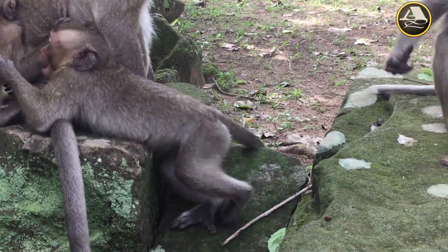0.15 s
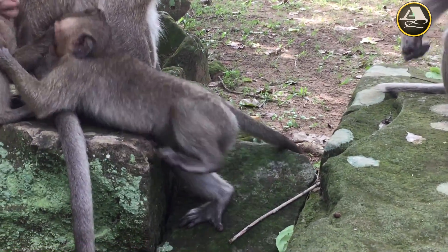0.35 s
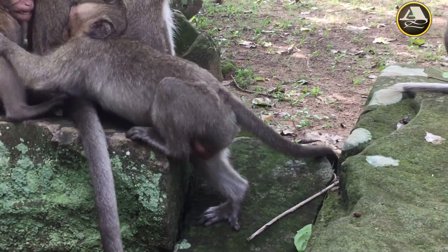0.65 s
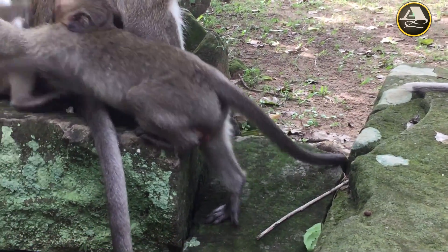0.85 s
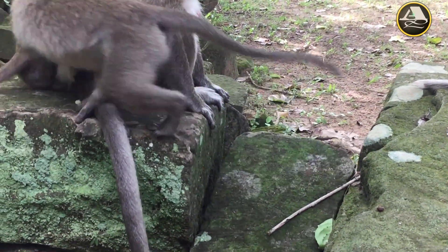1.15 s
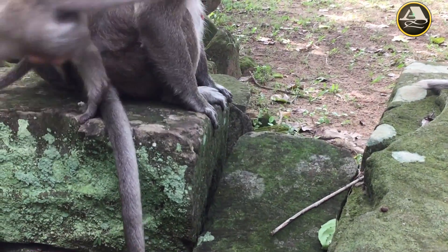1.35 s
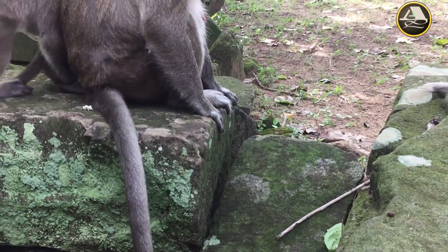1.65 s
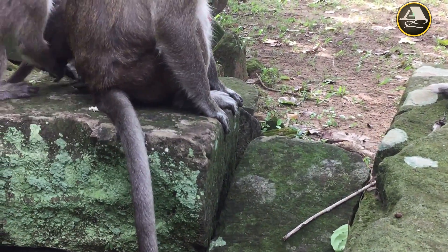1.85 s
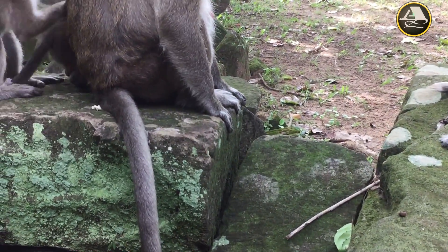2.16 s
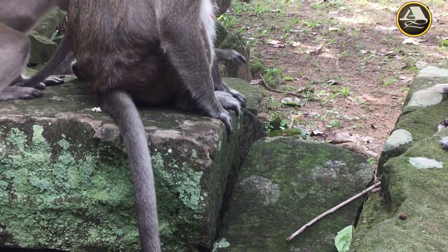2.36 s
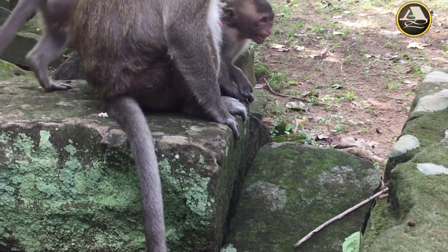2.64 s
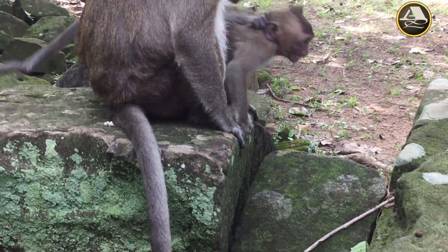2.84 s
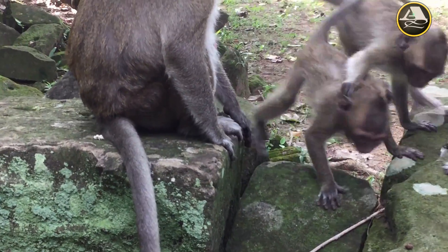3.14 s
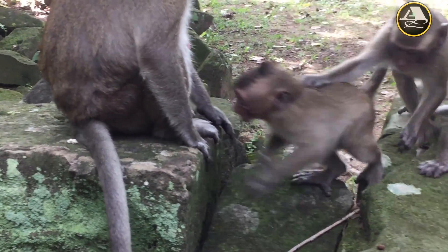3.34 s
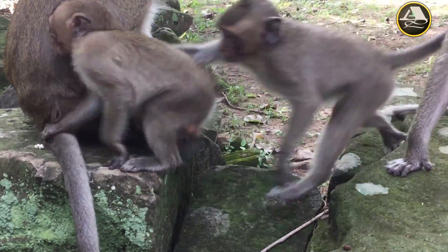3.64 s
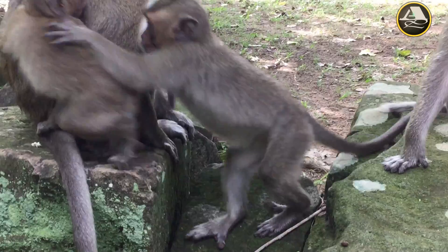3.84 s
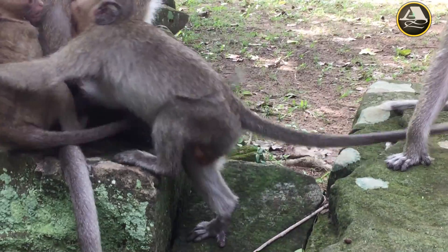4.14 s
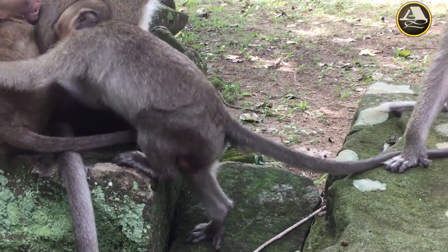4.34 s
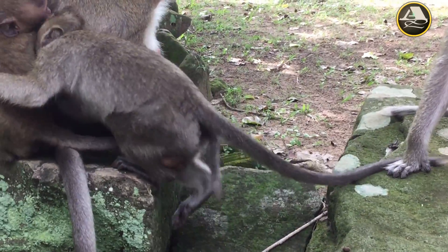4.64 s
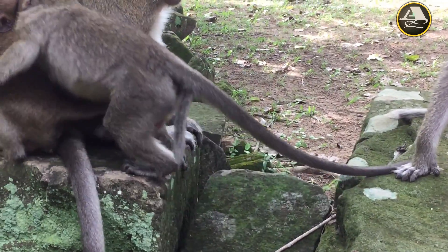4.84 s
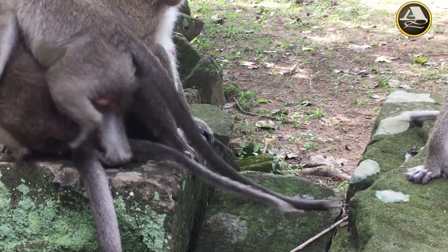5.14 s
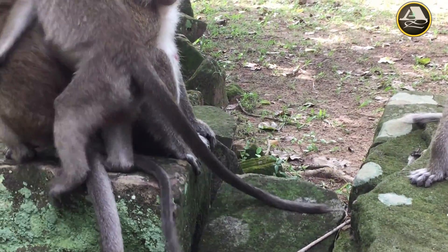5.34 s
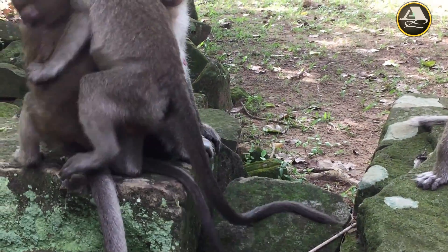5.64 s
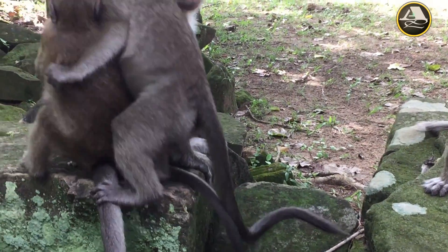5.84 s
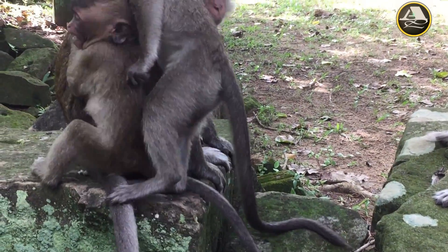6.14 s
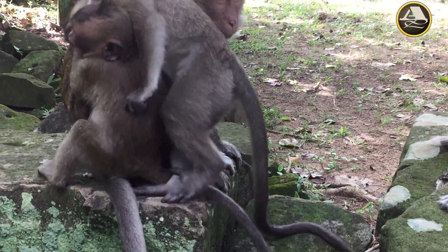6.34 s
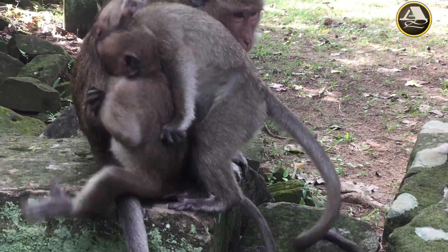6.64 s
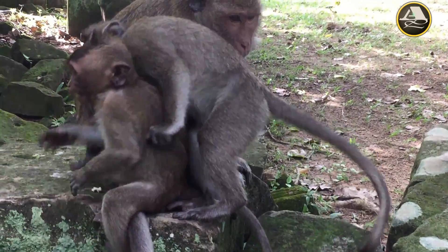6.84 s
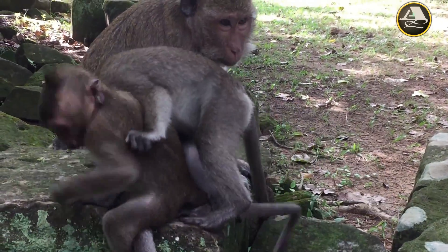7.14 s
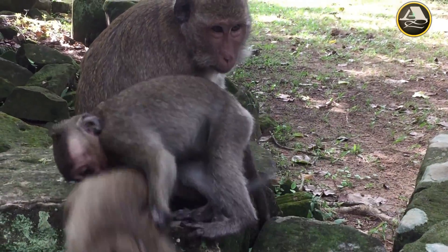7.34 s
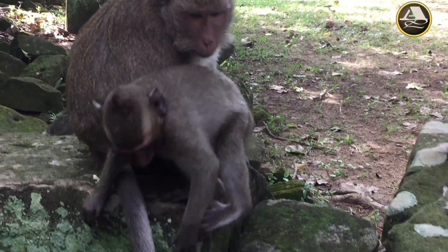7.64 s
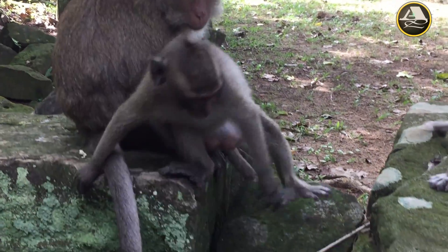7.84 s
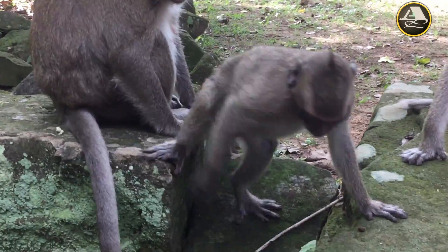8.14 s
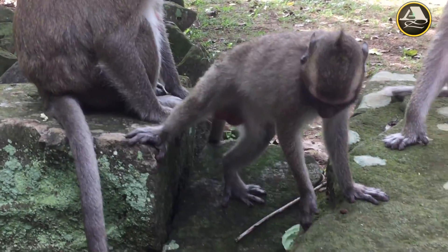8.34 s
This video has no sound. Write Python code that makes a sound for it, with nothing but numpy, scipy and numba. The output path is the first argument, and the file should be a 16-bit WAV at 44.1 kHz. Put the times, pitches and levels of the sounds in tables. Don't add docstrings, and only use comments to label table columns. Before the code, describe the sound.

Outdoors among trees, young monkeys quarrel a few metres from a single-channel microphone. A fading rasp gives way to a quick pulsed chatter, then isolated squeaks and raspy chirps with gaps between. Faint paw scuffs and claw ticks touch stone. Short screams break into rasp, and the last second brings the loudest, most crowded cries. A deep, steady far traffic rumble continues throughout, and each cry leaves a short diffuse echo.

```python
import sys
import numpy as np
from scipy import signal
from scipy.fft import rfft, irfft, next_fast_len
from scipy.io import wavfile
from scipy.ndimage import uniform_filter1d
from numba import njit

SR = 44100
rng = np.random.default_rng(int(sys.argv[2]) if len(sys.argv) > 2 else 0)


def invert_db(x):
    u = np.asarray(x, float) / 20
    return 10 ** u


def wrap_up_sound(samples):
    columns = np.atleast_2d(samples).T
    tamed = np.clip(columns, -1, 1)
    steps = np.round(tamed * 32767).astype(np.int16)
    wavfile.write(sys.argv[1], SR, steps)


N = 374409
T = np.arange(N) / SR

# t/s, length/s, f/Hz, level/dB, octave re pitch/dB
STEADY_WHISTLES = [(.5, .28, 4680, -70.5, -20), (0.908, .039, 4190, -33.5, -7),
                   (2.147, .007, 4500, -39, -23), (2.157, .008, 3490, -36.5, -14),
                   (2.187, .022, 3592, -30.5, -11), (3.068, .013, 5312, -29, -9),
                   (3.084, .027, 3784, -28.5, -5), (4.431, .011, 5040, -32, -28), (7.61, .02, 6375, -36, 4),
                   (7.627, .033, 5900, -38, 2), (7.797, .06, 3337, -28.5, -24),
                   (8.284, .036, 3254, -30.5, -27), (8.446, 0.019, 3286, -22.5, -23)]
# t/s, length/s, first f/Hz, last f/Hz, level/dB
FALLING_WHISTLES = [
    (1.115, .016, 4800, 4550, -47),
    (4.493, .04, 4766, 3950, -36),
    (5.033, .008, 4352, 4200, -56),
    (5.454, .037, 4018, 2750, -28.5),
    (5.512, 0.0097, 4897, 4640, -38),
]
# (t/s, f/Hz, level/dB)
LONG_WHISTLES = [
    (-5.5, [(0, 2980, -47.5), (.04, 2980, -55.5), (.16, 2980, -70)]),
    (-18.5, [(2.728, 5250, -49.5), (2.738, 5350, -29), (2.75, 5780, -30.5), (2.772, 5520, -25), (2.785, 4130, -36)]),
    (-7, [(3.13, 5040, -26), (3.141, 5450, -30), (3.152, 5283, -27), (3.158, 5345, -28), (3.167, 4200, -33)]),
    (-3.5, [(5.06, 4503, -49), (5.08, 4500, -43.5), (5.09, 4200, -38.5), (5.098, 3621, -47)]),
    (-8, [(5.54, 3985, -40), (5.56, 5366, -36.5), (5.574, 5200, -39.5), (5.584, 4710, -35.5), (5.612, 3710, -36)]),
    (-17, [(7.5, 3017, -32), (7.52, 2638, -21.5), (7.54, 2620, -26.5), (7.558, 2912, -27), (7.585, 3106, -46)]),
]
# (t/s, f/Hz, level/dB)
LAST_CRY = [
    (-1.5, [(8.149, 3800, -42), (8.156, 5016, -32), (8.165, 5808, -29), (8.19, 5696, -28.5), (8.212, 6600, -30), (8.234, 6573, -22), (8.239, 6570, -35)]),
    (-9.5, [(8.242, 4392, -39), (8.248, 4030, -23.5), (8.262, 3150, -18.5), (8.28, 2560, -31.5)]),
    (-11, [(8.32, 2315, -40), (8.346, 2220, -45), (8.37, 3300, -29.5), (8.386, 3800, -35), (8.398, 4800, -31.5), (8.41, 4050, -30), (8.425, 3620, -39)]),
]
# t/s, length/s, f/Hz, level/dB, partial 3 re level/dB
CHIRPS = [
    (1.911, .017, 1720, -43, -7),
    (3.625, 0.015, 1800, -48, 2.5),
    (4.432, 0.021, 1700, -46, 8.5),
    (4.455, 0.019, 1308, -44.5, 2.5),
    (7.048, 0.02, 1590, -31, -10),
    (7.626, .013, 1940, -43, 2.5),
    (8.473, .015, 840, -51, 17),
]
# t/s, slow pitch f/Hz, level/dB
SCREAMS = [
    [(5.358, 1290, -42), (5.368, 1327, -34), (5.385, 1500, -49), (5.404, 1474, -45), (5.42, 1420, -45),
     (5.437, 1315, -43)],
    [(7.381, 1398, -35), (7.399, 1433, -28.5), (7.423, 1442, -35), (7.439, 1283, -37), (7.454, 1434, -25),
     (7.482, 1300, -32), (7.51, 1160, -30)],
]
SCREAM_PARTIALS_DB = [
    (-18, 0, -13, -1.4),
    (-23.5, 0.02, -3, 0.018),
]
# partial number, level column it follows, level re column/dB
SQUEAK_STACK = [(1, 0, 0), (2, 1, 0), (3, 1, -13), (4, 1, -18)]
CHIRP_STACK = [(1, 0, 0), (2, 1, -3), (3, 1, 0), (4, 1, -5), (5, 2, 1), (6, 2, 0), (7, 2, -1), (8, 2, -3),
               (9, 2, -4)]
SCREAM_STACK = [(2, 0, 0), (3, 1, 0), (4, 2, -8), (5, 2, 0), (6, 3, 0), (7, 2, -8), (8, 2, -10),
                (9, 3, -17)]

# t/s, length/s, throat f/Hz, level/dB, mouth re throat/dB
SWELLS = [(.913, .043, 2800, -27.5, 11), (.956, 0.047, 2760, -26.5, 5), (3.071, 0.043, 3290, -29, 17.5),
          (3.15, .016, 4600, -30, 9), (4.435, 0.042, 2760, -32, 14.5), (4.492, .042, 2790, -40.5, 3),
          (5.421, 0.076, 3250, -37.5, 11.5), (5.5, 0.16, 3150, -51.5, -3), (7.38, .07, 2880, -29.5, 10.5),
          (7.451, .093, 2752, -23.5, 2.5), (7.72, 0.1, 3260, -23.5, -13.5), (8.232, .048, 3220, -21, 0),
          (8.405, .06, 3390, -20.5, -13.5)]
BURSTS = [(1.949, 0.009, 1767, -38.5, -26), (1.98, .014, 1466, -47, -13), (2.184, .02, 3604, -22, -19),
          (2.204, .014, 2610, -30, 1), (2.218, 0.017, 1600, -39, -8.5), (3.129, .02, 3087, -47.5, 17),
          (3.1665, .018, 2548, -32.5, -9.5), (5.084, 0.022, 2780, -43, 10.5),
          (5.356, .064, 3070, -37.5, -9), (7.872, .028, 2926, -35, -17), (7.94, .07, 2800, -49.5, 4.5),
          (8.145, .008, 2400, -34.5, -1.5), (8.281, .05, 3170, -20, -11)]
HISSES = [
    (7.545, .042, 2800, -28.5, 4),
    (7.628, .092, 2800, -49.5, 10.5),
    (7.813, .058, 3306, -54.5, 0),
    (7.901, .028, 3217, -51, -5),
    (8.21, .022, 3600, -23, 2.5),
    (8.332, .072, 3202, -46, -1),
]
DYING = [
    (0, .16, 2550, -44.5, -5.5),
]
# t/s, length/s, level/dB
CHATTER = [
    (1.057, 0.033, -32.5),
    (1.107, 0.065, -38),
    (1.174, 0.055, -39),
    (1.234, 0.057, -39.5),
    (1.296, 0.052, -42),
    (1.344, 0.027, -43.5),
    (1.371, 0.092, -51),
]
# t/s, slap rate f/Hz, unevenness (0-1), chest tone level/dB
SLAPS = [
    (0, 1300, .2, -46.5),
    (7.72, 1300, 0.3, -38),
    (7.75, 395, 0.08, -27),
    (7.812, 480, 0.03, -15.5),
    (7.868, 1300, 0.4, -36),
    (8.27, 1300, .25, -40),
    (8.29, 370, .07, -25.5),
    (8.401, 900, .15, -50),
    (8.42, 400, .05, -25),
    (8.49, 390, 0.05, -20),
]
# f/Hz, width/Hz, level/dB
MOUTH = [(6970, 1100, 1), (8440, 2500, 0.99)]
TEETH = [(12380, 1400, -7.5), (14200, 2500, -13)]
HOLD_SHAPE = 0.8, -0.03, -9, -6.5
FALL_SHAPE = (1.04, 0.35, -4.5, -1.5)
CHIRP_SHAPE = (0.6, -0.46, 0, -8.5)
SWELL_SHAPE = (0.3, 0.82, -12.5, -6.5)
BURST_SHAPE = (.15, .5, -4.5, -12)
HISS_SHAPE = (-0.7, 0.9, -4.5, -3.5)
CHATTER_SHAPE = (0.07, 0.27, -8.5, -12.5)
DYING_SHAPE = (0.3, 0.3, 1, -24)

# t/s, level/dB, length/s
PADS = [
    (3.781, -50.5, 0.0049),
    (5.963, -48, 0.032),
    (7.881, -46, 0.0137),
    (7.999, -55.5, 0.058),
]
CLAWS = [
    (1.109, -30.5, .003),
    (3.372, -55, 0.018),
    (3.408, -55, 0.0052),
    (3.818, -46, 0.0045),
    (7.066, -46.5, 0.0046),
    (7.248, -57, .03),
    (7.679, -39.5, 0.045),
]
FUR = [
    (.684, -70.5, .02),
    (1.99, -54, .012),
    (3.504, -52.5, 0.024),
    (3.553, -59, .02),
    (3.634, -54, .035),
    (3.716, -60, 0.0118),
    (3.831, -57, 0.016),
]
# thud level/dB, scrape level/dB, hiss level/dB
TOUCH_DB = [
    (2, -19.5, -21.5),
    (-10, 0.5, -7.5),
    (-15, -10, -3.5),
]
# t/s, f/Hz, level/dB
WHINE = [
    (0.8, 1014, -58.5),
    (1.47, 1037, -58.5),
    (2.9, 705.6, -66.5),
]
# f/Hz, density level/dB
WOOD_SPECTRUM = [(13, -57.5), (22, -30.5), (63, -4), (92, 0), (115, -1), (147, -11), (270, -29.5),
                 (328, -34), (432, -37.5), (730, -39.5), (1580, -40), (4760, -48.5), (5170, -50.5),
                 (16000, -64)]

FALL_BEND, FALL_OCTAVE_DB = 1.8, -6.5
CHIRP_SAG, CHIRP_TOP_DB = 0.05, -28
CHATTER_HZ, CHATTER_SAG_HZ_PER_S = 2480, 350
CHATTER_MOUTH_DB, CHATTER_CLOSING_DB_PER_S = -5, -23
SWELL_TEETH_DB, BURST_TEETH_DB, BARED_TEETH_DB, CHATTER_TEETH_DB = -9.5, -14, 4.5, -7.5
THROAT_WIDTH_HZ, THROAT_SKIRT_DB, HUSH_DB = 620, -10, -8
ECHO_T60_S, ECHO_TREBLE_T60_S, ECHO_DB = 0.44, 0.31, -15
WOOD_DB = -39.5


def unit(x):
    return x / np.sqrt(np.mean(x ** 2))


@njit
def resonate(x, g, k):
    y, band, low = np.empty(len(x)), 0., 0.
    for i in range(len(x)):
        v = (band + g[i] * (x[i] - low)) / (1 + g[i] * (g[i] + k[i]))
        band = 2 * v - band
        low = low + 2 * g[i] * v
        y[i] = k[i] * v
    return y


def ring(x, modes, shift=1):
    out = 0
    for hz, width, db in modes:
        hz = hz * shift * np.ones(len(x))
        g, k = np.tan(np.pi * hz / SR), width / hz
        out = out + invert_db(db) * resonate(resonate(x, g, k), g, k)
    return unit(out)


def walk(rate):
    k = max(int(SR / rate), 1)
    steps = np.repeat(rng.standard_normal(N // k + 1), k)
    return unit(uniform_filter1d(steps, k)[:N])


def contours(tables, edge_s):
    rows = np.concatenate(tables)
    s, *columns = rows[np.argsort(rows[:, 0], kind="stable")].T
    gate, k = np.zeros(N), max(int(edge_s * SR), 1)
    for note in tables:
        gate[int(note[0][0] * SR):int(note[-1][0] * SR) + 1] = 1
    gate = uniform_filter1d(gate, k, origin=(k - 1) // 2)
    return gate, [uniform_filter1d(np.interp(T, s, c), k) for c in columns]


def breath(s, length, shape, hz, dbs, drop_hz=0):
    rise, hold, first_db, last_db = shape
    share = np.array([0, np.clip(rise, .02, .6), np.clip(hold, .05 + rise, .97), 1])
    levels = np.add.outer([first_db, 0, 0, last_db], dbs)
    return np.column_stack([s + length * share, hz - drop_hz * share ** FALL_BEND, levels])


def voice(tables, stack, jitter, shimmer_db):
    gate, (hz, *dbs) = contours(tables, edge_s=.003)
    on, out, flicker = gate > 1e-6, np.zeros(N), shimmer_db * walk(250)
    trembling_hz = hz * (1 + jitter * walk(500))
    phase = 2 * np.pi * np.cumsum(trembling_hz[on]) / SR
    for k, column, db in stack:
        partial_db = np.maximum(dbs[column][on], dbs[0][on] - 22.0)
        level = invert_db(db + partial_db + np.roll(flicker, k * SR // 7)[on])
        out[on] += (k * hz[on] < SR * 9 / 20) * level * np.sin(k * phase)
    return np.sqrt(2) * gate * out, gate


def squeaks():
    notes = [breath(s, n, HOLD_SHAPE, hz, [db, db + up]) for s, n, hz, db, up in STEADY_WHISTLES]
    for s, n, first_hz, last_hz, db in FALLING_WHISTLES:
        notes.append(breath(s, n, FALL_SHAPE, first_hz, [db, db + FALL_OCTAVE_DB], first_hz - last_hz))
    for up, cry in LONG_WHISTLES + LAST_CRY:
        notes.append(np.array([(s, hz, db, db + up) for s, hz, db in cry]))
    return voice(notes, SQUEAK_STACK, jitter=.01, shimmer_db=2.5)


def chirps():
    notes = []
    for s, n, hz, db, up in CHIRPS:
        dbs = [db, db + up, db + up + CHIRP_TOP_DB]
        notes.append(breath(s, n, CHIRP_SHAPE, hz, dbs, CHIRP_SAG * hz))
    return voice(notes, CHIRP_STACK, jitter=.012, shimmer_db=3)


def screams():
    notes = [np.array([(s, hz, *np.add(db, partials)) for s, hz, db in rows])
             for rows, partials in zip(SCREAMS, SCREAM_PARTIALS_DB)]
    return voice(notes, SCREAM_STACK, jitter=.013, shimmer_db=4)


def rasp_notes():
    kinds = [(SWELLS, SWELL_SHAPE, SWELL_TEETH_DB), (BURSTS, BURST_SHAPE, BURST_TEETH_DB),
             (HISSES, HISS_SHAPE, BARED_TEETH_DB), (DYING, DYING_SHAPE, BURST_TEETH_DB)]
    out = []
    for rows, shape, teeth in kinds:
        for s, n, hz, db, mouth in rows:
            out.append(breath(s, n, shape, hz, [db, db + mouth, db + mouth + teeth]))
    for s, n, db in CHATTER:
        since = s - CHATTER[0][0]
        hz = CHATTER_HZ - CHATTER_SAG_HZ_PER_S * since
        mouth = CHATTER_MOUTH_DB + CHATTER_CLOSING_DB_PER_S * since
        out.append(breath(s, n, CHATTER_SHAPE, hz, [db, db + mouth, db + CHATTER_TEETH_DB]))
    return out


def rasp(voiced):
    gate, (throat_hz, throat_db, mouth_db, teeth_db) = contours(rasp_notes(), edge_s=0.0028)
    s, *columns = np.transpose(SLAPS)
    rate, uneven, chest_db = (np.interp(T, s, c) for c in columns)
    cycles = np.cumsum(rate * np.exp(uneven * walk(900))) / SR
    slaps = np.diff(np.floor(cycles), prepend=0) * np.sqrt(SR / rate) * invert_db(2 * walk(900))
    turbulence = np.clip(3 * uneven, .12, .7) * rng.standard_normal(N)
    on = gate > 1e-6
    source = (slaps + turbulence)[on]
    throat = ring(source, [(throat_hz[on], THROAT_WIDTH_HZ, 0)], 1 + 0.07 * walk(100)[on])
    skirt = ring(source, [(4200, 970, 11), (1600, 320, -1.0)])
    chest = (invert_db(chest_db) * np.sin(2 * np.pi * cycles))[on]
    throat = throat + invert_db(THROAT_SKIRT_DB) * skirt + chest
    mouth = ring(source, MOUTH, 1 + 0.12 * walk(40)[on])
    teeth = ring(source, TEETH, 1 + .04 * walk(37)[on])
    out = np.zeros(N)
    out[on] = invert_db(throat_db[on]) * throat + invert_db(mouth_db[on]) * mouth + invert_db(teeth_db[on]) * teeth
    return gate * invert_db(HUSH_DB * uniform_filter1d(voiced, SR // 70)) * out


def scuffs():
    grit = rng.standard_normal(N) * invert_db(4 * walk(700))
    parts = [ring(grit, [mode]) for mode in [(577, 1540, 0), (4050, 4000, 0), (11790, 9200, 0)]]
    out = np.zeros(N)
    for rows, kind in zip([PADS, CLAWS, FUR], TOUCH_DB):
        for s, db, length in rows:
            at = slice(int(s * SR), int(s * SR) + SR // 4)
            u = (T[at] - T[at][0]) / max(length, .002)
            drag = 4.8 * u * np.exp(1 - 2.0 * u)
            out[at] += drag * sum(invert_db(level - 8.5) * p[at] for level, p in zip(np.add(db, kind), parts))
    return out


def scatter(near):
    t = T[:SR]
    tail = rng.standard_normal(SR) * (1 - np.exp(-t / .008)) * invert_db(-60 * t / ECHO_T60_S)
    dull = signal.lfilter([.45], [1, -.55], tail)
    tail = dull + (tail - dull) * invert_db(-60 * t / ECHO_TREBLE_T60_S)
    thin = signal.sosfilt(signal.butter(2, 2600, "high", fs=SR, output="sos"), near)
    return invert_db(ECHO_DB) * signal.fftconvolve(thin, tail / np.sqrt(np.sum(tail ** 2)))[:N]


def whine():
    gate, (hz, db) = contours([WHINE], edge_s=0.42)
    smear = unit(uniform_filter1d(rng.standard_normal(N), int(SR / 110)))
    return gate * invert_db(db + 4.0) * smear * np.sin(2 * np.pi * np.cumsum(hz) / SR)


def wood():
    hz, db = np.transpose(WOOD_SPECTRUM)
    n = next_fast_len(N, True)
    f = np.fft.rfftfreq(n, 1 / SR) + 1
    colour = rfft(rng.standard_normal(n)) * invert_db(np.interp(np.log(f), np.log(hz), db))
    return invert_db(WOOD_DB + .5 * walk(4)) * unit(irfft(colour, n)[:N])


def scene():
    whistling, tight = squeaks()
    chirping, slack = chirps()
    screaming, forced = screams()
    voiced = np.max([tight, slack, forced], axis=0)
    near = whistling + chirping + screaming + rasp(voiced) + scuffs()
    return (near + scatter(near) + whine() + wood())[None]


def roll_off(x):
    return signal.sosfilt(signal.butter(12, 16460, fs=SR, output="sos"), x)


def record(dry):
    return roll_off(dry)


dry = scene()
out = record(dry)
wrap_up_sound(out)
```